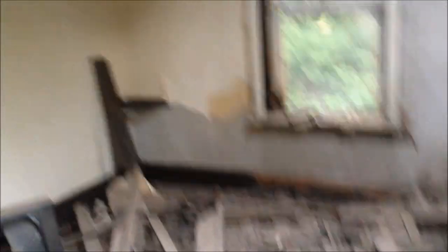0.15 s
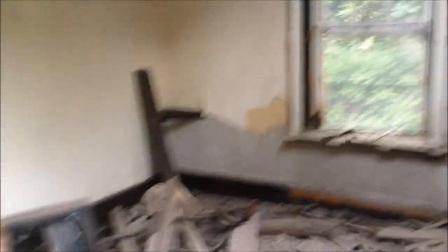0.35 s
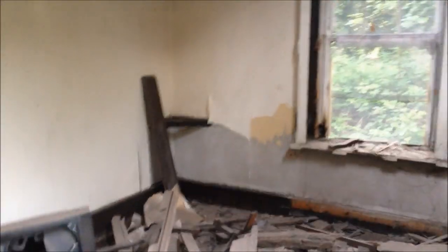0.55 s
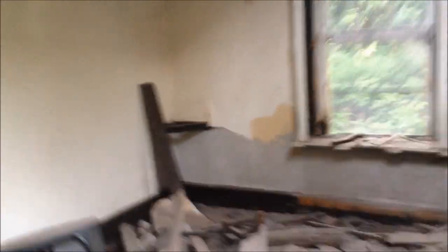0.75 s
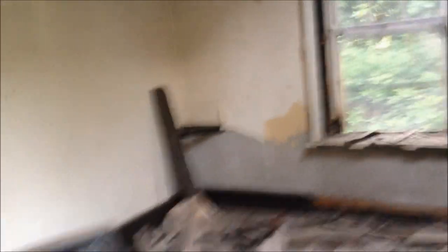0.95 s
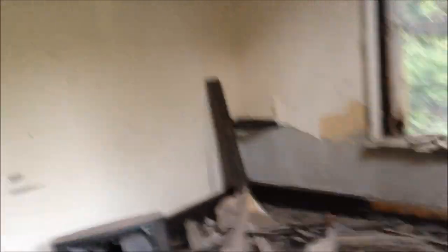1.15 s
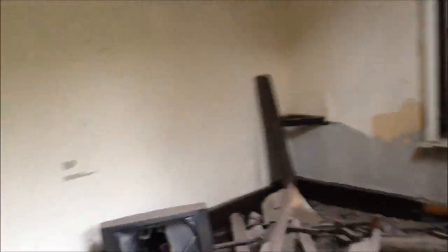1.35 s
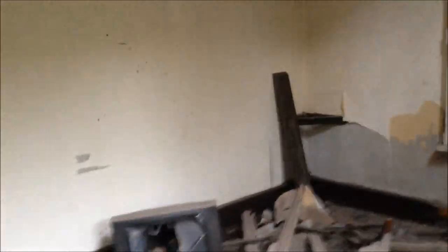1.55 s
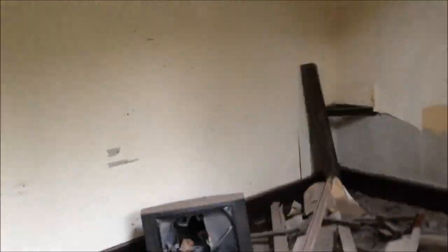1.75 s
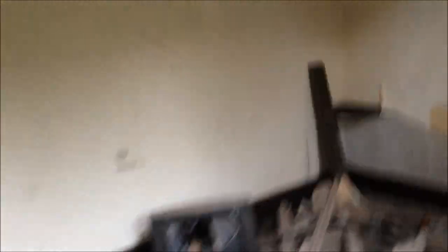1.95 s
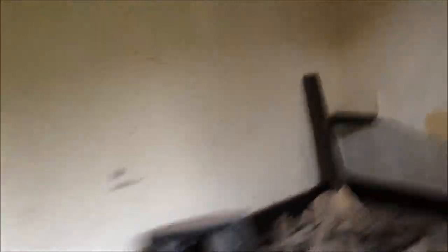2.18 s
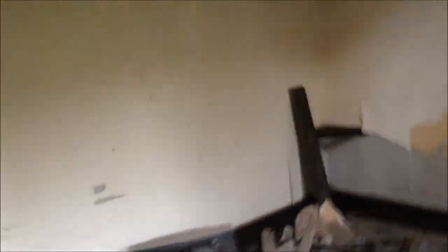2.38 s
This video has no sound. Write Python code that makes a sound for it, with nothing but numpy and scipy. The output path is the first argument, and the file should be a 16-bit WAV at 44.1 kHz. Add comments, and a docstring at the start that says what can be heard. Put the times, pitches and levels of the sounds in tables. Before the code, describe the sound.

Footsteps crunch on broken wood and plaster in a small bare room, close-miked. Faint ticks open, then brittle snaps and grit burst at 0.2-0.35 s. Stronger cracks and dull board knocks cluster at 0.58-0.85 s, another at 1.0 s, then woody clacks around 1.2-1.45 s. Near quiet follows, with tiny ticks and a soft gritty scuff at 2.0-2.2 s over faint hiss.

```python
"""In a small bare room, someone shifts their weight over broken laths and plaster, close to a microphone.
Laths snap: tiny fractures ring each piece, with a dry crack and settling crumbs. Boards knock and short
laths clack as dying tones, and chips tick as puffs of bright noise. Plaster grit crunches under the sole
as thousands of tiny ringing grains; a last light scuff follows. Air and microphone hiss lies underneath."""
import sys
import numpy as np
from scipy import signal
from scipy.io import wavfile
from scipy.ndimage import uniform_filter1d

SR = 44100
rng = np.random.default_rng(int(sys.argv[2]) if len(sys.argv) > 2 else 0)


def voltage_ratio(level):
    """Linear amplitude factor for a level in decibels (scalar or array-like)."""
    return 10 ** (np.asarray(level, float) / 20)


def int16_out(signal):
    """Quantize to a 16-bit WAV file."""
    q = np.round(np.clip(np.atleast_2d(signal).T, -1, 1) * 32767)
    wavfile.write(sys.argv[1], SR, q.astype(np.int16))


N = 110250  # samples: 2.5 s

# tone of crushed plaster, under the sole and in the crumbs: (frequency [Hz], level per Hz [dB])
GRIT_TONE = [(240, -32), (400, -6), (488, 6.5), (715, 1), (1120, 2.5), (2400, 4), (2710, 3), (5310, -2.5),
             (15500, -24)]
GRAINS_PER_S = 18000  # average number of crushed grains each second


def evened(x):
    """Scales a sound to an average strength (rms) of 1."""
    return x / np.sqrt(np.mean(x ** 2) + 1e-20)


def peaked(x):
    """Scales a sound so that its loudest two milliseconds have rms 1."""
    return x / np.sqrt(uniform_filter1d(x ** 2, size=88).max() + 1e-20)


def read(points, hz):
    """Reads a table between its points, on a logarithmic frequency axis."""
    f, value = np.transpose(points)
    return np.interp(np.log(hz + 1), np.log(f + 1), value)


def add(mix, s, sound):
    """Mixes a sound in, starting at s seconds."""
    part = mix[max(round(s * SR), 0):][:len(sound)]
    part += sound[:len(part)]


def colour(x, points):
    """Filters a sound to the given spectrum, without any sound ahead of its cause (minimum phase)."""
    level_db = read(points, abs(np.fft.fftfreq(4096, 1 / SR)))
    log_gain = np.log(voltage_ratio(np.maximum(level_db, -100)))
    response = np.exp(np.conj(signal.hilbert(log_gain)))
    taps = np.fft.ifft(response).real[:2048]
    return signal.oaconvolve(x, taps)[:len(x)]


def ring(t, hz, db, t60):
    """One mode (way of vibrating): a pure tone that fades by 60 dB in t60 seconds."""
    return voltage_ratio(db - 60 * t / t60) * np.sin(2 * np.pi * hz * t)


def clicks(per_s):
    """A random train of clicks of either sign, a few of them large, coming in clumps."""
    spread_db, clump_db = 2, 2
    happens = rng.random(N) < per_s / SR
    size = np.minimum(rng.exponential(1, N), 4)
    sign = rng.choice([-1., 1.], N)
    slow_noise = uniform_filter1d(uniform_filter1d(rng.standard_normal(N), size=300), size=300)
    return sign * voltage_ratio(spread_db * size + clump_db * evened(slow_noise)) * happens


def hiss():
    """Air and microphone noise: steady random noise, shaped in tone."""
    # tone of the hiss: (frequency [Hz], level per Hz [dB])
    hiss_tone = [(15, -27), (25, 11), (107, -2.5), (313, 1), (399, -5), (1110, -22), (1270, -8.5),
                 (1570, -24), (14300, -13), (15500, -25)]
    return voltage_ratio(-61.5) * evened(colour(rng.standard_normal(N), hiss_tone))


def grains():
    """Every click makes one grain ring for a few cycles, at one of 24 pitches."""
    ring_cycles = 4.0
    train = clicks(GRAINS_PER_S)
    pick = rng.integers(0, 24, N)
    t = np.arange(1024) / SR
    out = np.zeros(N)
    for k, hz in enumerate(np.geomspace(350, 15000, num=24)):
        fade = np.exp(-np.pi * t * hz / ring_cycles)
        grain = t * hz * fade * np.sin(2 * np.pi * hz * t)
        grain = np.sqrt(hz) * grain / np.linalg.norm(grain)
        out += signal.oaconvolve(train * (pick == k), grain)[:N]
    return out


def grind():
    """Plaster grains crush under the sole while the boards below creak dully with the load."""
    # how hard the sole grinds: (time [s], grit level [dB], board creak level [dB])
    grind_levels = [(0, -53.5, -58), (0.049, -58, -74), (.09, -67, -77), (0.189, -64, -69),
                    (.21, -44.5, -41.5), (.27, -40.5, -47), (.33, -46, -51), (0.379, -55, -66),
                    (.43, -53.5, -56), (.47, -50.5, -50.5), (.57, -52, -51), (.60, -45.5, -44.5),
                    (.67, -39.5, -47), (.70, -48, -44.5), (.76, -45, -50), (0.788, -38, -51),
                    (.86, -53.5, -46), (.92, -49.5, -47), (.97, -52, -67), (1.008, -49.5, -41.5),
                    (1.07, -51.5, -62), (1.15, -54, -66), (1.22, -46.5, -52), (1.28, -49.5, -53),
                    (1.33, -53.5, -55), (1.37, -43, -44.5), (1.41, -50, -45), (1.45, -54, -58),
                    (1.49, -60.5, -51), (1.54, -64.5, -66), (1.62, -65, -81), (1.69, -62, -82),
                    (1.8, -65, -80), (1.942, -59.5, -74), (2.05, -49.5, -54.5), (2.12, -52.5, -54.5),
                    (2.2, -54, -60), (2.22, -63.5, -68), (2.5, -67, -70)]
    # dull tone of the loaded boards: (frequency [Hz], level per Hz [dB])
    load_tone = [(18, -34), (30, -8.5), (108, -3.5), (183, 0), (220, -5), (280, -9), (342, -9),
                 (517, -14.5), (900, -16.5), (1170, -44), (1980, -120)]
    s, grit_db, load_db = np.transpose(grind_levels)
    t = np.arange(N) / SR
    grit = evened(colour(grains(), GRIT_TONE))
    creaks = evened(colour(clicks(400), load_tone))  # 400 small creaks a second
    return voltage_ratio(np.interp(t, s, grit_db)) * grit + voltage_ratio(np.interp(t, s, load_db)) * creaks


def knock(s, db, hz, t60):
    """A soft push rings the low modes of a loose board."""
    # modes of a board: (pitch ratio, level [dB], fade time ratio)
    board_modes = [(.4, -6.5, 0.98), (.62, -3.5, 1.1), (1.0, 6.5, 0.71), (1.75, -1.5, 0.75),
                   (3.2, -5, 0.67)]
    trim_db, push_s = -7.5, 0.0065
    t = np.arange(8192) / SR
    body = np.zeros(len(t))
    for ratio, level, fade_ratio in board_modes:
        detune = 1 if ratio == 1 else rng.uniform(0.886, 1.164)  # the main mode keeps its pitch
        body += ring(t, hz * ratio * detune, level, t60 * fade_ratio)
    push = 1 - np.exp(-t / push_s)
    softened = uniform_filter1d(push * body, size=40)
    return s, -voltage_ratio(db + trim_db) * peaked(softened)


def snap(s, db, hz, crack_db, length):
    """A few milliseconds of tiny fractures ring the piece and crack dryly; then crumbs settle."""
    # modes of a snapped piece: (pitch ratio, level [dB])
    piece_modes = [(0.362, -11), (.68, -16.5), (1.0, 3.5), (1.281, -2), (1.698, -10.5)]
    # tone of the dry crack: (frequency [Hz], level per Hz [dB])
    crack_tone = [(150,-23.5),(400,-15),(800,1),(1500,-5.5),(2600,0),(4000,-7),(6000,-11.5),(9000,-20),(16000,-28.5)]
    lead_s, lead_db = .012, -23  # the piece crackles briefly before it gives
    fractures_per_s, tear_rise = 14000, .45  # rise as a share of the tearing length
    piece_t60_s, crumble_t60_s = .014, .12
    trim_db, crumble_db = -6, -11
    t = np.arange(6000) / SR
    chance = rng.random(len(t))
    fracture_noise, crumb_noise = rng.standard_normal((len(t), 2)).T

    x = np.maximum(t - lead_s, 0) / max(length, .002)  # progress of the tearing
    rise = np.minimum(voltage_ratio(lead_db) * (t / lead_s) ** 2 + (x / tear_rise) ** 2, 1)
    tear = fracture_noise * (chance < fractures_per_s / SR) * rise * np.exp(-x ** 3)

    modes = np.zeros(len(t))
    for ratio, level in piece_modes:
        detune = 1 if ratio == 1 else rng.uniform(0.789, 1.153)  # the main mode keeps its pitch
        modes += ring(t, hz * ratio * detune, level, piece_t60_s)
    body = peaked(signal.fftconvolve(tear, modes)[:len(t)])

    crack = peaked(colour(tear, crack_tone))
    crumbs = evened(colour(crumb_noise * (chance < GRAINS_PER_S / SR), GRIT_TONE))
    crumbs *= rise * voltage_ratio(crumble_db - 60 * (t - lead_s) / crumble_t60_s)
    sound = body + voltage_ratio(crack_db) * (crack + crumbs)
    return s - lead_s - .003, voltage_ratio(db + trim_db) * sound


def clack(s, db, hz, t60):
    """A short lath gives one woody note: a single fading tone with a quick, soft start."""
    t = np.arange(4096) / SR
    note = (1 - np.exp(-t * hz)) * ring(t, hz, 0, t60)
    return s, voltage_ratio(db) * peaked(note)


def chip(s, db, hz):
    """A flying chip ticks: a tiny puff of noise, filtered to a bright band."""
    puff_s, half_width = .007, .2  # half the bandwidth, as a share of the centre
    t = np.arange(1024) / SR
    puff = rng.standard_normal(len(t)) * np.sin(np.pi * np.minimum(t / puff_s, 1)) ** 2
    edges = [hz * (1 - half_width), min(hz * (1 + half_width), SR / 2.2)]
    band = signal.butter(1, edges, "band", fs=SR, output="sos")
    return s - puff_s / 2, voltage_ratio(db) * peaked(signal.sosfilt(band, puff))


def room(x):
    """Sparse reflections of random sign, each frequency band dying at its own speed."""
    # how long the echoes last: (frequency [Hz], time to fade by 60 dB [s])
    fade_times = [(100, 0.2), (400, 0.17), (1500, 0.31), (4000, 0.1), (10000, 0.15)]
    gap_s = 0.0045  # silence ahead of the first reflection
    taps = np.zeros(SR // 2)
    at = np.arange(round(gap_s * SR), len(taps) - 20, 20)
    at += rng.integers(0, 20, len(at))
    taps[at] = rng.choice([-1., 1.], len(at))
    hz, t, z = signal.stft(taps, SR, nperseg=256)
    fade = voltage_ratio(-60 * t / read(fade_times, hz)[:, None])
    tail = signal.istft(z * fade, SR, nperseg=256)[1]
    return signal.fftconvolve(x, tail / np.linalg.norm(tail))[:N]


def scene():
    """Knocks, snaps, clacks, chips and the grind in the room, over the hiss; both channels are alike."""
    # boards knocking: (time [s], level before the trim [dB], main pitch [Hz], fade time before the ratios [s])
    knocks = [(0.009, -51, 345, 0.13), (0.2, -41, 134, 0.049), (0.216, -34, 204, 0.2),
              (0.268, -25, 125.3, 0.085), (0.314, -27, 171, 0.057), (0.44, -30, 329, 0.062),
              (0.52, -30.5, 401, 0.071), (0.579, -21.5, 185.5, 0.11), (0.605, -26.5, 202.2, 0.15),
              (0.649, -27.5, 205, 0.06), (0.763, -17, 185, 0.056), (0.782, -21.5, 350, 0.08),
              (0.838, -27, 96, 0.08), (0.89, -35, 88.5, 0.11), (0.982, -20, 205, 0.047),
              (1.095, -32.5, 150.8, 0.11), (1.12, -31.5, 169, 0.04), (1.204, -33, 586, 0.042),
              (1.232, -22.5, 282, 0.027), (1.264, -25, 326, 0.027), (1.341, -24, 386.7, 0.1),
              (1.359, -28, 113, 0.065), (1.42, -27, 183, 0.083), (1.444, -30.5, 154.6, 0.073),
              (1.477, -46, 184, 0.038), (1.867, -51, 283, 0.12)]
    # laths snapping: (time [s], level before the trim [dB], main pitch [Hz],
    # crack and crumbs against the ring [dB], tearing length [s])
    snaps = [(0.046,-41,1820,-8,0.0041),(0.142,-45.5,770,-4,0.0038),(0.205,-37.5,1800,-1,0.013),(0.223,-28,780,-5,0.0055),
             (.241,-22.5,2940,3.5,0.007),(0.244,-20,2060,-15,0.01),(.266,-18.5,2770,-1,0.0088),(0.272,-22,2270,-16,0.016),
             (0.289,-25.5,2340,-8,0.013),(0.312,-27,2360,-13,.008),(0.315,-32.5,2230,-13,0.018),(0.329,-36,2420,-15,0.0089),
             (0.36,-38,2310,-25,0.011),(0.371,-45,2270,-16,0.011),(0.447,-34,2710,2.5,0.0098),(0.529,-30.5,1070,-4.5,0.0073),
             (0.583,-20,2050,-17.5,0.011),(0.6,-42,4580,-1,.004),(0.62,-20,2744,-20,0.0073),(.622,-39,4180,-7,0.011),
             (0.647,-28,2260,-8,0.011),(0.664,-37,2830,3,0.0087),(.731,-21,2876,-4.5,0.0084),(0.753,-41,2400,11.5,0.0043),
             (0.77,-29.5,2040,11.5,0.0061),(0.785,-27.5,1780,-8,0.0096),(0.797,-36,2410,-8,0.0029),(0.82,-33,1730,-14,0.009),
             (0.902,-42,1430,0,0.0033),(0.961,-42,1830,-4,0.0026),(0.985,-26,2730,7.5,0.0068),(1.06,-42,3280,-9,0.0064),
             (1.099,-36.5,1770,0,0.01),(1.172,-45,2980,-1,0.0033),(1.188,-37,2720,-6,0.0099),(1.24,-27.5,2985,1.5,0.0075),
             (1.257,-25,1160,-6,0.0045),(1.293,-40,2600,-8,.005),(1.347,-33.5,1130,1.5,0.0046),(1.358,-36,3280,1.5,0.0093),
             (1.426,-32,2050,-0.5,0.0043),(1.441,-32.5,1010,-8,0.0066),(1.665,-49,1310,-5,0.006),(1.868,-41,2500,-10,0.0051),(1.876,-43,2450,-2,0.0038),
             (1.977,-44.5,724,1,0.004),(1.989,-55,2580,0,0.0065),(2.031,-53.5,1790,2,.005),(2.097,-41,855,-8,0.0059),
             (2.17,-52,2830,-13,0.0054),(2.204,-45.5,3030,-8,0.0098)]
    # short laths clacking: (time [s], level [dB], pitch [Hz], time to fade by 60 dB [s])
    clacks = [(.241,-33,870,0.015),(.267,-32.5,920,0.021),(.523,-41,643,0.029),(.58,-29,424,0.021),(.732,-36,1260,0.02),
              (.766,-27.5,640,0.035),(.79,-42,704,0.11),(.986,-30.5,568,0.024),(.986,-37,1020,0.018),(1.207,-47,520,0.022),
              (1.24,-38,635,0.039),(1.265,-40,657,0.082),(1.346,-33,399,0.035),(1.425,-34,407,0.02),(1.45,-39.5,687,0.032)]
    # chips ticking: (time [s], level [dB], centre of the band [Hz])
    chips = [(.62,-40,11500),(0.662,-39,10800),(.732,-37.5,8700),(0.766,-41,10800),(0.952,-52,7460),(0.987,-42,13500),
             (1.24,-56,11500),(1.345,-49,10500),(1.739,-57,7960),(1.977,-51,10800)]
    hits = np.zeros(N)
    for source, table in ((knock, knocks), (snap, snaps), (clack, clacks), (chip, chips)):
        for row in table:
            add(hits, *source(*row))
    near = hits + grind()
    mono = near + voltage_ratio(-12.5) * room(near) + hiss()
    return np.array([mono, mono])


def top_cut(x):
    """Nothing passes above the cut-off."""
    return signal.sosfilt(signal.butter(12, 15900, fs=SR, output="sos"), x)


def record(dry):
    """A small microphone picks up little deep bass and almost nothing in the highest treble."""
    # response of the microphone: (frequency [Hz], gain [dB])
    mic_response = [(20,-16),(45,-7),(80,-1),(120,0),(15000,0),(15400,-3),(15750,-60),(22000,-90)]
    finished = np.array([colour(x, mic_response) for x in dry])
    return top_cut(finished)


dry = scene()
out = record(dry)
int16_out(out)
```